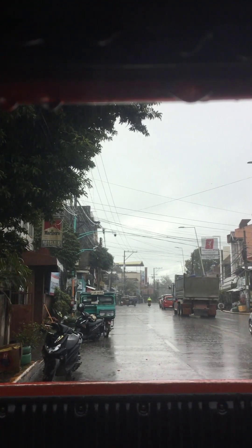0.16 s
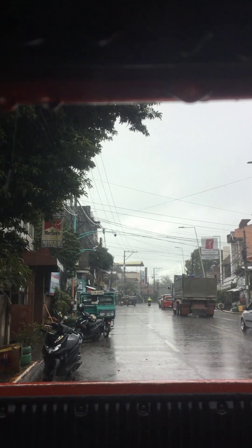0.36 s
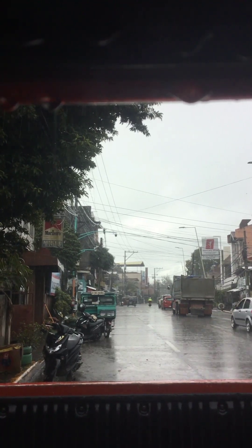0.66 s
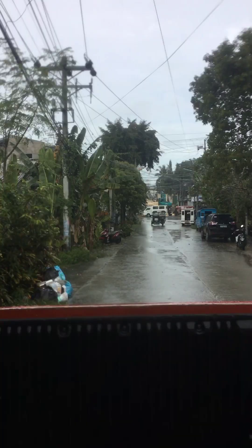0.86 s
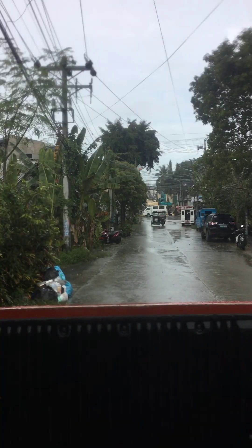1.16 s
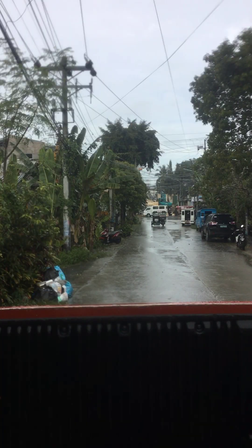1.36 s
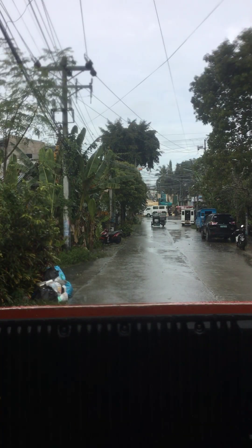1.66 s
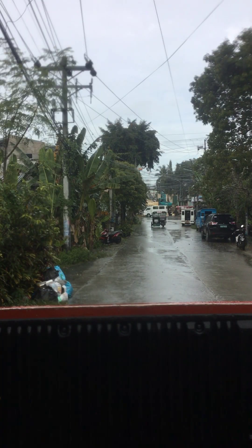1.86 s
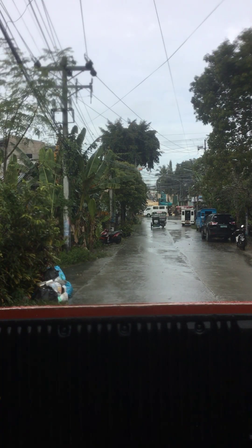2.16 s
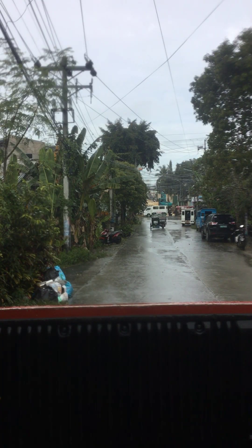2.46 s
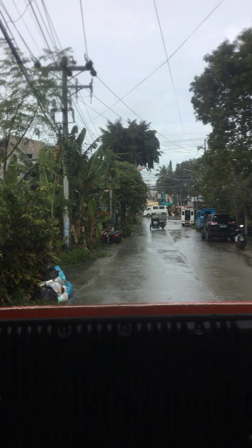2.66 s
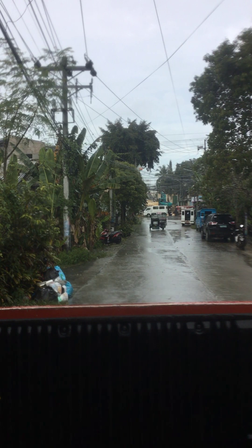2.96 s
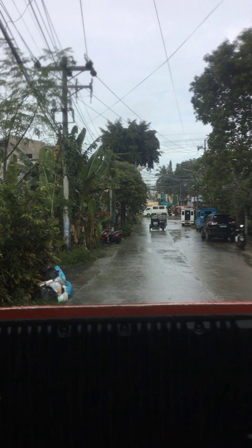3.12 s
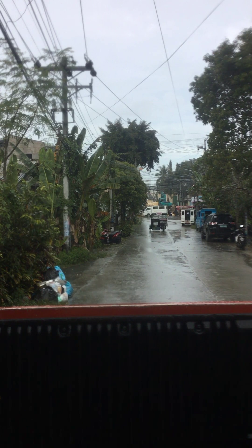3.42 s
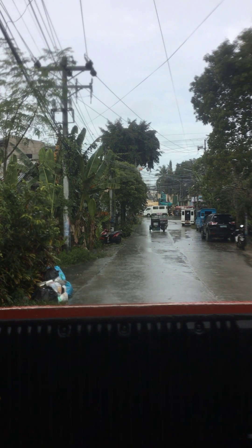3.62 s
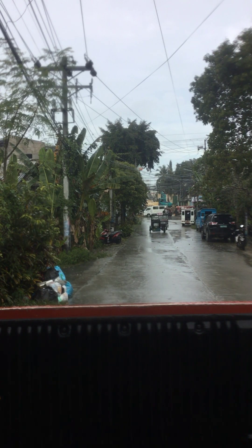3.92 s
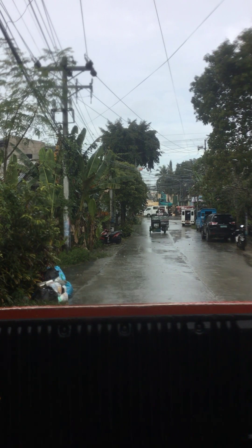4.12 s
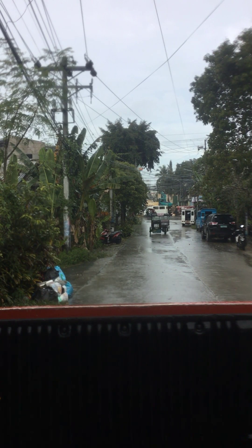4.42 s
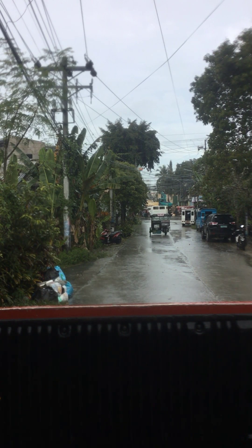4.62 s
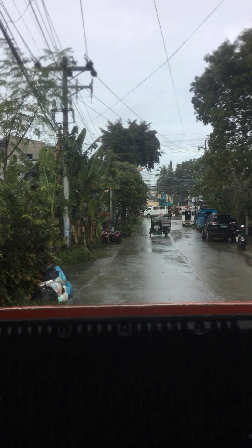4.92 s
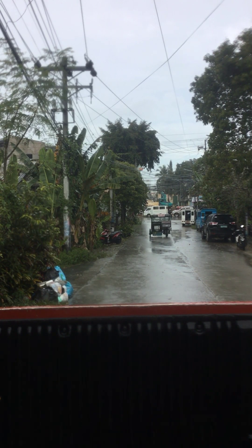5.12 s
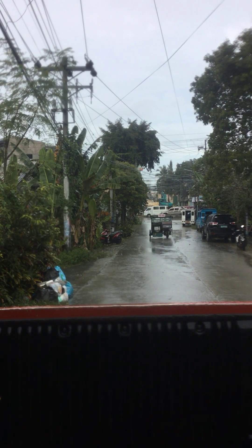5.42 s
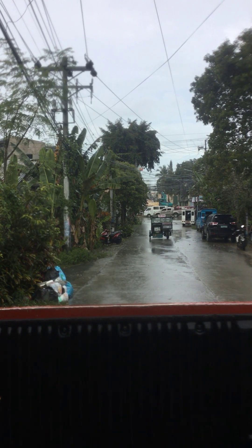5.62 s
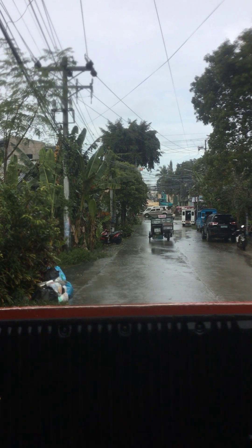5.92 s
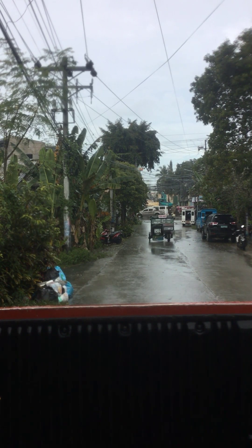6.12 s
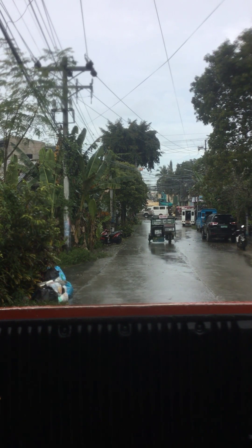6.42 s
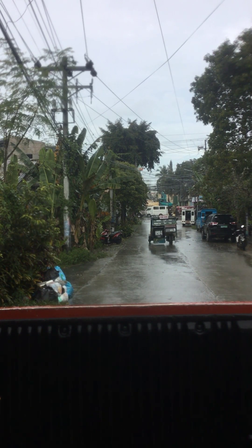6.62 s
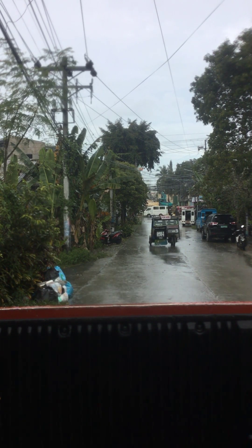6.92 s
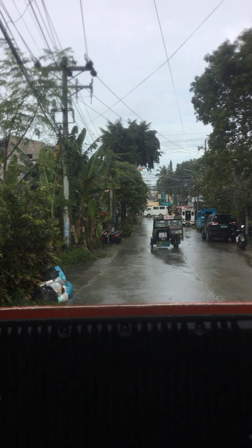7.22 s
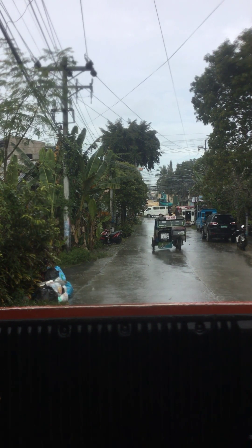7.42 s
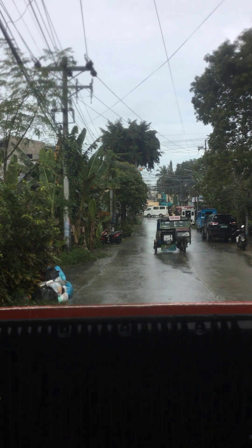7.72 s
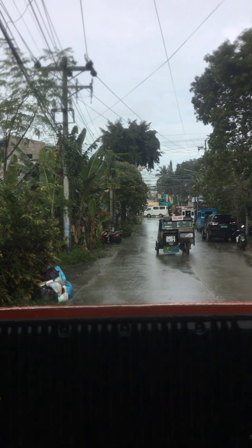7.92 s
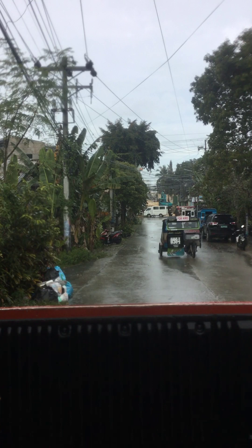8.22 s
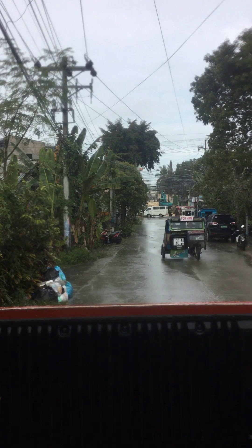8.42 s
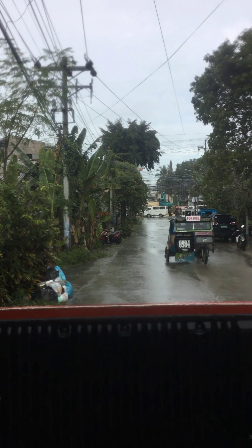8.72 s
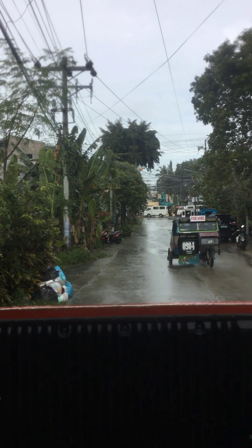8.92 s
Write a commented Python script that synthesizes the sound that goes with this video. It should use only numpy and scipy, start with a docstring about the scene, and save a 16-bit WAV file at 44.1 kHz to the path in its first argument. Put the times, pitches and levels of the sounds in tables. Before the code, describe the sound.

Heard from inside a small idling truck. Heavy rain hisses on the street and drums on the roof for under a second, with knocks on the body growing to a hard thump. It cuts abruptly to a much quieter wet lane: the idle throbs and clatters, low hums hold steady, a distant motor tricycle revs in short pulls, then drives closer with a buzzing exhaust. Faint drips tick on the bodywork.

```python
"""Heavy rain drums on the roof of a small idling truck and something knocks on its body; then, abruptly,
it is a quiet lane after the shower: the idle throbs and clatters, steady tones hum, a motor tricycle revs
in short pulls and putters closer, and a few drips tick on the bodywork.
The engine, hum and exhaust tones are sines; the clatter, rain and tyre spray are noise or random impacts
shaped by spectra and resonances; knocks and drips are short sounds that die away."""
import sys
import numpy as np
from scipy.fft import rfft, irfft, next_fast_len
from scipy.io import wavfile
from scipy.ndimage import map_coordinates

SR = 44100
rng = np.random.default_rng(int(sys.argv[2]) if len(sys.argv) > 2 else 0)


def inscribe(sig):
    """Save sig as 16-bit PCM at rate SR to the path in sys.argv[1].

    A 1-D sig is mono; a 2-D sig holds one channel per row.
    Samples are clipped to [-1, 1] before scaling.
    """
    pcm = np.round(np.clip(np.atleast_2d(sig).T, -1, 1) * 32767)
    wavfile.write(sys.argv[1], SR, pcm.astype(np.int16))


N = 399987

LANE_START_S = 0.770
CYCLE_HZ = 8.892  # four-stroke cycles per second
TOP_HZ = 15720  # band limit of the whole sound

# Idle boom in the cab. Each row: multiple of the engine cycle rate, rms level in dB.
IDLE = [(3, -74), (6, -48.5), (9, -40.5), (12, -53.5), (15, -60.5), (18, -62.5), (24, -58.5), (36, -58.5)]
# Rumble of the shaking body. Each row: frequency in Hz, relative level in dB per Hz.
RUMBLE = [(25, -44), (40, -23), (55, -5), (75, -4.5), (100, 3.5), (115, -5), (165, 1.5), (210, -5.5),
          (285, -8), (325, -7.5), (370, -5.5), (410, -16.5), (600, -15), (1000, -59)]
# Spectrum of the engine clatter. Each row: frequency in Hz, relative level in dB per Hz.
CLATTER = [(300, -15), (550, 6), (750, 11.5), (950, -3.5), (1500, 5), (2500, -29), (4000, -7),
           (5800, -18.5), (7800, -27.5), (9000, -25.5), (11000, -45), (15500, -50)]
# Cab air and panel resonances. Each row: frequency in Hz, width in Hz, relative level in dB.
CAB = [(713, 156, -3), (1175, 142, -0.5), (1600, 200, -1.5), (2136, 130, -0.5), (2801, 150, 1.5),
       (3567, 283, -7), (4250, 125, -11), (5016, 120, -12.5), (6230, 150, -30.5), (6620, 52, -21.5),
       (9160, 400, -35.5), (10800, 100, -34), (12350, 170, -39)]
# Rasping exhaust lines. Each row: multiple of the firing rate, rms level in dB before RASP_DB is added.
EXHAUST = [(7, -60.5), (10, -58), (14, -57.5)]
# Cab modes that boost a passing exhaust line. Each row: frequency in Hz, half width in Hz,
# strength in dB of the sound added to the plain line.
BOOMS = [(258.2, 4, 2), (360, 3.8, 9)]
# Short throttle pulls. Each row: start in seconds, length in seconds, starting note in Hz, level in dB.
PULLS = [(0.779, 0.44, 137.8, -51.5), (1.66, 0.64, 141.5, -43.5), (3.625, 0.682, 147, -46.5)]
# The drive up the lane on a held throttle. Each row: time in seconds, exhaust note in Hz, level in dB.
DRIVE = [(4.45, 140.7, -49.3), (4.7, 140.7, -49), (5.25, 150.1, -41), (6.05, 151.4, -44.5),
         (6.6, 150.0, -43), (6.88, 150.1, -38), (7.15, 155.5, -43.5), (7.42, 154.8, -40.4),
         (8.1, 157, -48.5), (8.85, 156.1, -43.2)]
# Hiss of the wet tyres. Each row: frequency in Hz, relative level in dB.
TYRE_HISS = [(400, -4), (1600, 1), (2800, 0.0), (4200, 7.5), (6600, 12.5), (9500, 7.5), (15000, 3)]
# Spectrum of rain on the street. Each row: frequency in Hz, relative level in dB per Hz.
RAIN = [(76, -30), (130, -3.5), (179, -2.5), (267, -10), (330, -4), (458, -8.5), (726, -6), (1320, -10),
        (2180, -9.5), (3320, -15), (4400, -15.5), (6000, -31), (9200, -36), (11000, -45), (15500, -51)]
# Roof panel modes rung by rain. Each row: frequency in Hz, width in Hz, relative level in dB.
ROOF = [(175, 42, 4.5), (322, 19, 6.5), (573, 25, -5.5), (726, 76, -2), (1060, 78, -1.5), (1585, 175, 1.5),
        (2170, 94, -6), (4100, 410, -12), (5160, 120, -12.5), (6410, 110, -21.5)]
# Idle boom in the downpour. Each row: multiple of the engine cycle rate, rms level in dB.
WET_IDLE = [(6, -47), (9, -32), (12, -37)]
# Blows on the body. Each row: time in seconds, thud level in dB, rattle level in dB.
KNOCKS = [(0.176, -39, -43), (0.384, -40, -36), (0.399, -33, -21), (0.594, -30, -47), (0.7223, -21, -19.5),
          (0.738, -28.5, -28), (6.121, -40.5, -45), (6.189, -46, -39), (7.574, -37, -41)]
# Body modes in a thud. Each row: frequency in Hz, relative level in dB, seconds to fade by 60 dB.
BODY = [(102, 2, 0.39), (179, 2.5, 0.091), (206.6, -2, 0.1), (260, -10, 0.11), (322, 1.5, 0.077),
        (353, -8.5, 0.11), (537, -13, 0.076), (714, -11, .07)]
# Dull rattle of a blow. Each row: frequency in Hz, relative level in dB.
RATTLE = [(60, -25), (200, -12), (750, 3), (1500, -7.5), (3000, -15), (6000, -25), (15000, -60)]
# Drips on the bodywork. Each row: time in seconds, splash level in dB, ring level in dB.
DRIPS = [(2.235, -63, -74), (3.25, -62, -80), (4.161, -69, -75), (5.328, -66, -75), (6.122, -63, -59),
         (6.194, -74, -48), (7.576, -59, -51)]
# Tinny ring of a drip. Each row: frequency in Hz, width in Hz, relative level in dB.
TIN = [(5040, 300, 12), (6700, 400, -3), (9050, 700, -18), (10830, 200, -21)]
# Splash of a drip. Each row: frequency in Hz, relative level in dB.
SPLASH = [(1000, 0), (10000, 2), (15500, -6)]
# Steady hums: fan and belt drive, plus a cab resonance near 364 Hz.
# Each row: frequency in Hz, rms level in dB.
HUMS = [(97.6, -56), (195.3, -55), (222, -56.5), (253.5, -60), (364, -61.5)]

REV_HZ_PER_S = 17  # how fast the note climbs during a pull
OPEN_S, CLOSE_S = 0.0795, 0.15  # time for a pull to rise and to fade
START_M, SPEED_M_PER_S = 44.6, 3.86  # the tricycle's first distance and its closing speed
RASP_DB, UNDER_DB, TYRES_DB = -1, -45.5, -54  # upper exhaust lines, fifth line and tyres, all at 10 m
RAIN_DB, RAIN_SWELL_DB = -30.5, 0.5  # base level of the rain, depth of its slow swells
TRICKLE_S, TRICKLE_LENGTH_S, TRICKLE_DB = 3.18, 0.27, -74  # level before the swell and bass cut


def amp(db):
    """Turn decibels into gain."""
    return 10 ** (np.asarray(db) / 20)


def unit(x):
    """Scale to rms 1."""
    return x / np.sqrt(np.mean(x ** 2) + 1e-20)


def curves(rows):
    """Join the points of each column after the time, giving one value per sample."""
    s, *cols = np.transpose(rows)
    return [np.interp(np.arange(N) / SR, s, c) for c in cols]


def wobble(rate):
    """Make a smooth random curve with this many random points a second."""
    points = rng.standard_normal(int(N * rate / SR) + 4)
    return map_coordinates(points, [np.arange(N) * rate / SR])


def filtered(x, response):
    """Multiply the spectrum of x by a response that depends on frequency."""
    m = next_fast_len(N + SR // 2)
    hz = np.fft.rfftfreq(m, 1 / SR)
    return irfft(rfft(x, m) * response(hz), m)[:N]


def coloured(x, points):
    """Shape x by a spectrum of (Hz, dB) points, at rms 1."""
    f, db = np.transpose(points)
    return unit(filtered(x, lambda hz: amp(np.interp(np.log(hz + 1), np.log(f), db))))


def resonated(x, modes):
    """Ring x through steep-sided (Hz, width, dB) resonances, at rms 1."""
    def peak(hz, centre, width):
        damping = 1.5j * hz * width
        return (damping / (centre * centre - hz * hz + damping)) ** 2  # squared for steep sides

    return unit(filtered(x, lambda hz: sum(amp(db) * peak(hz, c, w) for c, w, db in modes)))


def tone(turns):
    """A sine of rms 1 that follows a running count of turns, from a random start."""
    return np.sqrt(2) * np.sin(2 * np.pi * (turns + rng.random()))


def drops(rate, spread_db):
    """Random impacts, this many a second on average, of varied strength, at rms 1."""
    lands = rng.random(N) < rate / SR
    return unit(lands * rng.standard_normal(N) * amp(spread_db * rng.standard_normal(N)))


def add(track, s, sound):
    """Mix a short sound in at time s."""
    part = track[round(s * SR):][:len(sound)]
    part += sound[:len(part)]


def idle(cycle):
    """Three firings a cycle boom steadily in the cab, over the rumble of the shaking body."""
    boom = sum(amp(db + 0.35 * wobble(5)) * tone(k * cycle) for k, db in IDLE)
    shake = amp(0.92 * np.sin(2 * np.pi * 3 * cycle) + 0.33 * wobble(14))
    rumble = unit(shake * coloured(rng.standard_normal(N), RUMBLE))
    return boom + amp(-44.0) * rumble


def clatter(cycle):
    """The engine's top end rattles unevenly, slightly louder at each firing, and rings the cab."""
    firing = amp(0.12 * np.sin(2 * np.pi * 3 * cycle))
    rattle = firing * amp(0.51 * wobble(13) + 0.94 * wobble(55) + 1.44 * wobble(260))
    ring = amp(-50.0 + 0.46 * wobble(30)) * resonated(rattle * rng.standard_normal(N), CAB)
    direct = amp(-53.5) * coloured(rattle * rng.standard_normal(N), CLATTER)
    return ring + direct


def tricycle():
    """A single-cylinder exhaust, strongest on its sixth line; rasp and wet tyre hiss grow as it nears."""
    note_hz, note_gain = throttle()
    distance_m = np.maximum(START_M - SPEED_M_PER_S * np.arange(N) / SR, 10)
    near = 10 / distance_m
    firing_hz = note_hz / 6  # the note is the sixth line of the firing rate
    firing = np.cumsum(note_hz * (1 + 0.003 * wobble(14))) / SR / 6
    note = amp(0.4 * wobble(6)) * tone(6 * firing)
    under = tone(5 * firing)

    def cab_gain(hz):
        return 1 + sum(amp(db) / (1 + ((hz - centre) / width) ** 2) for centre, width, db in BOOMS)

    rasp = np.zeros(N)
    for k, db in EXHAUST:
        line = tone(k * firing + 0.08 * wobble(25))  # the unsteady phase roughens it
        rasp += cab_gain(k * firing_hz) * amp(db + 1.6 * wobble(8.3)) * line
    spray = resonated(drops(rate=6500, spread_db=2.5), CAB)
    tyres = coloured(spray, TYRE_HISS)
    growing = amp(RASP_DB) * rasp + amp(UNDER_DB) * under + amp(TYRES_DB) * tyres
    return note_gain * note + near * growing


def throttle():
    """Exhaust note (Hz) and gain of the tricycle: a few rising pulls, then the long drive."""
    t = np.arange(N) / SR
    drive_hz, drive_db = curves(DRIVE)
    note_hz, gain = np.full(N, drive_hz[0]), np.zeros(N)
    for s, length, start_hz, db in PULLS:
        rising_hz = start_hz + REV_HZ_PER_S * np.clip(t - s, 0, length)
        note_hz = np.where(t >= s, rising_hz, note_hz)
        opening = np.clip((t - s) / OPEN_S, 0, 1)
        closing = np.clip(1 - (t - s - length) / CLOSE_S, 0, 1)
        gain = gain + amp(db) * opening * closing
    held = np.clip((t - DRIVE[0][0]) / OPEN_S, 0, 1)  # blends from the pulls into the drive
    return (1 - held) * note_hz + held * drive_hz, (1 - held) * gain + held * amp(drive_db)


def downpour(cycle):
    """Rain hisses on the street and drums on the roof in clumps, over a booming idle and a low panel hum."""
    rain_db = RAIN_DB + RAIN_SWELL_DB * wobble(3.9)
    clumps = amp(0.85 * wobble(24.3) + 0.9 * wobble(149.5))
    street = coloured(clumps * drops(rate=6000, spread_db=1.0), RAIN)
    roof = resonated(clumps * drops(rate=900, spread_db=2), ROOF)
    boom = sum(amp(db) * tone(k * cycle) for k, db in WET_IDLE)
    panel = resonated(rng.standard_normal(N), [(96.0, 14, 0)])  # Hz, width in Hz, dB
    return amp(rain_db - 1.5) * street + amp(rain_db - 3.0) * roof + boom + amp(-40.5) * panel


def knocks():
    """Blows on the body: each rings a few low modes and gives a short, dull rattle."""
    t, out = np.arange(SR // 3) / SR, np.zeros(N)
    loose = coloured(rng.standard_normal(N), RATTLE)
    for s, thud_db, rattle_db in KNOCKS:
        thud = np.zeros(len(t))
        for hz, level, t60 in BODY:
            mode_db = level + rng.normal(0, 2.5)  # each blow excites the modes differently
            thud += amp(mode_db - 60 * t / t60) * np.sin(2 * np.pi * hz * t)
        rattle = loose[round(s * SR):][:len(t)] * amp(-60 * t / 0.023)
        attack = 1 - np.exp(-t / 0.0002)
        add(out, s, attack * (amp(thud_db) * thud + amp(rattle_db) * rattle))
    # high-pass: keeps deep bass out of the knocks
    return filtered(out, lambda hz: (1j * hz / (1j * hz + 60)) ** 2)


def drips():
    """Each drip is a tiny splash and a tinny ring; droplets tick at random and water trickles once."""
    t, out = np.arange(SR // 6) / SR, np.zeros(N)
    tin = resonated(rng.standard_normal(N), TIN)
    wet = coloured(rng.standard_normal(N), SPLASH)
    for s, splash_db, ring_db in DRIPS:
        splash = amp(splash_db - 60 * t / 0.049) * wet[round(s * SR):][:len(t)]
        ring = amp(ring_db - 60 * t / 0.075) * tin[round(s * SR):][:len(t)]
        attack = 1 - np.exp(-t / 0.00083)
        add(out, s, attack * (splash + ring))
    progress = np.clip((np.arange(N) / SR - TRICKLE_S) / TRICKLE_LENGTH_S, 0, 1)
    trickle = amp(TRICKLE_DB) * np.sin(np.pi * progress) * drops(rate=600, spread_db=4)
    droplets = amp(-93) * drops(rate=25, spread_db=3)
    # tiny drops have no bass
    return out + filtered(trickle + droplets, lambda hz: (1j * hz / (1j * hz + 3000)) ** 2)


def hums():
    """Steady tones of the fan, the belt drive and a cab resonance share one slightly unsteady pitch."""
    drift = np.cumsum(1 + 0.00202 * wobble(3)) / SR
    return sum(amp(db + 2.1 * wobble(4)) * tone(hz * drift) for hz, db in HUMS)


def scene():
    """One engine cycle drives both parts; the downpour stops dead where the lane begins."""
    cycle = np.cumsum(CYCLE_HZ * (1 + 0.002 * wobble(4))) / SR
    in_lane = np.clip((np.arange(N) / SR - LANE_START_S) / 0.002, 0, 1)
    lane = idle(cycle) + clatter(cycle) + tricycle() + drips() + hums()
    return ((1 - in_lane) * downpour(cycle) + in_lane * lane + knocks())[None]


def record(dry):
    """Keep nothing above the band limit."""
    return filtered(dry[0], lambda hz: hz < TOP_HZ)[None]


dry = scene()
out = record(dry)
inscribe(out)
```